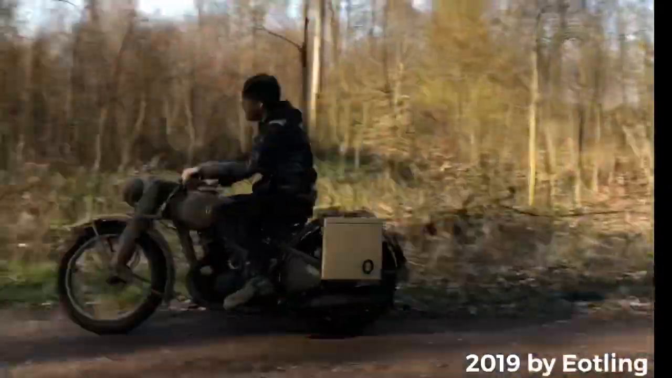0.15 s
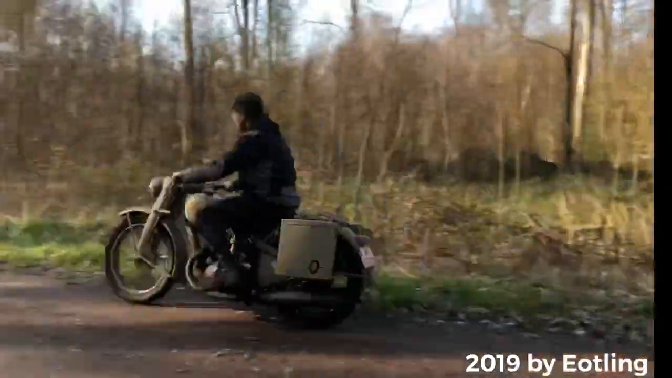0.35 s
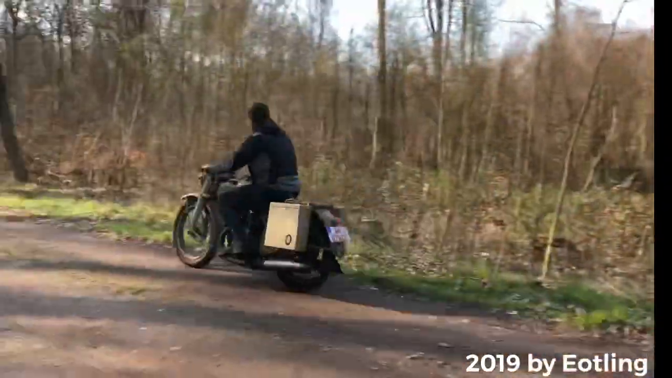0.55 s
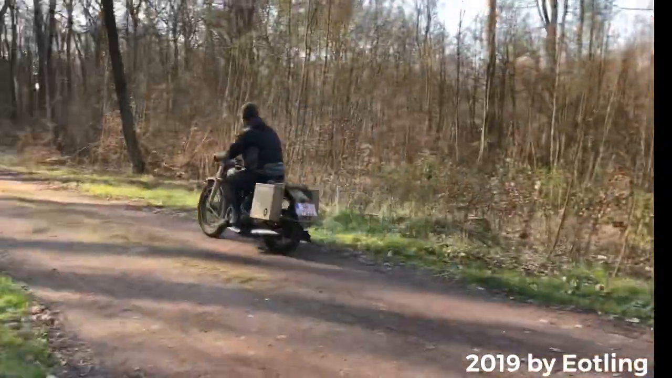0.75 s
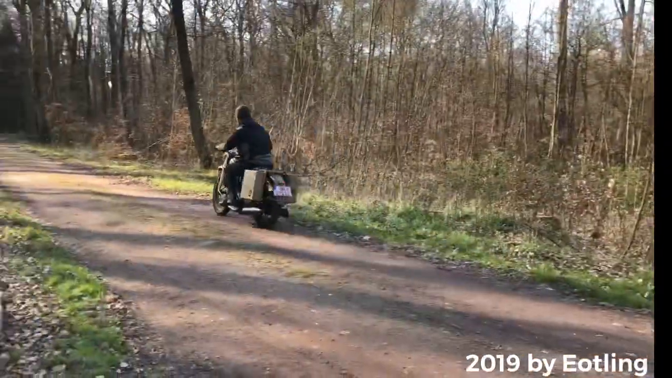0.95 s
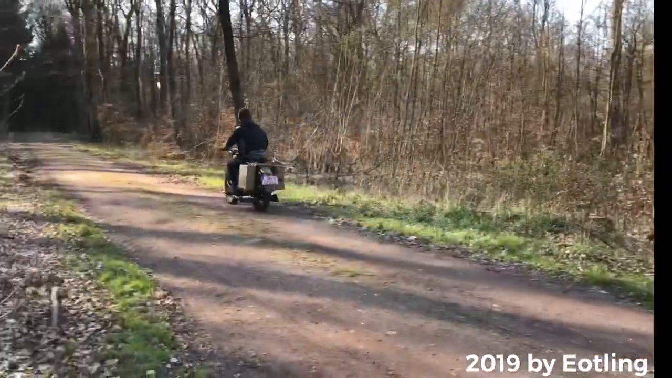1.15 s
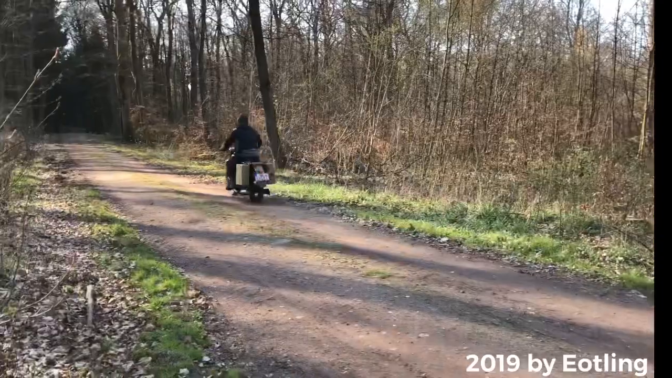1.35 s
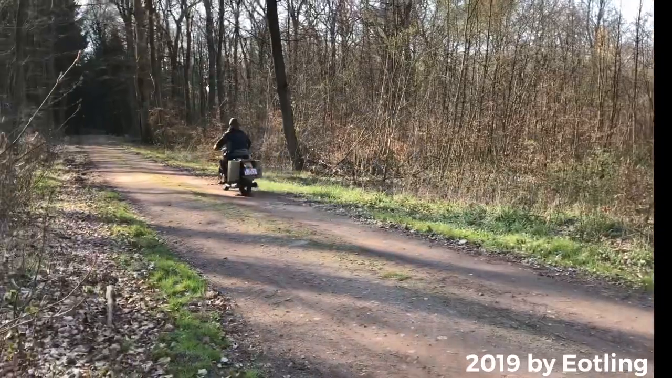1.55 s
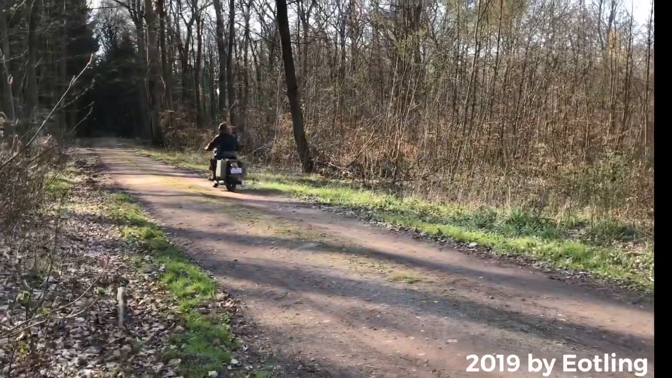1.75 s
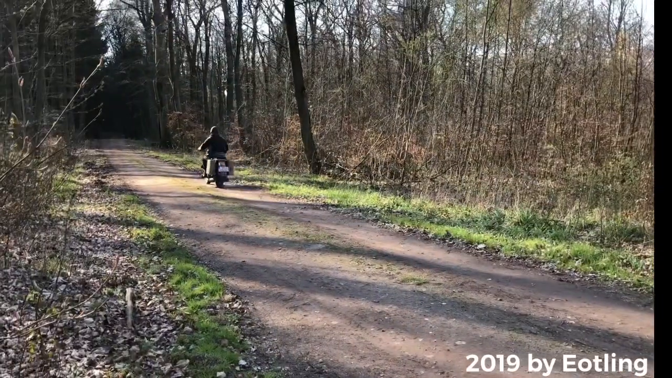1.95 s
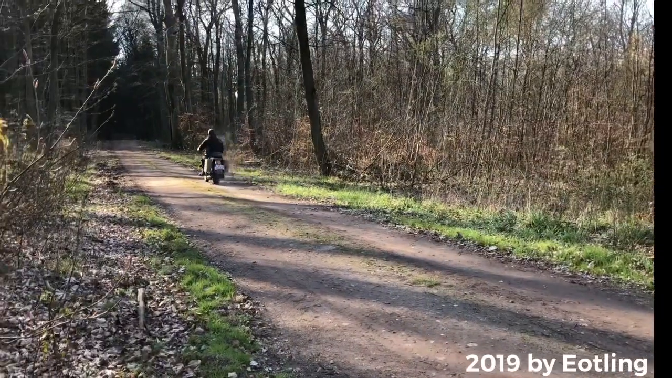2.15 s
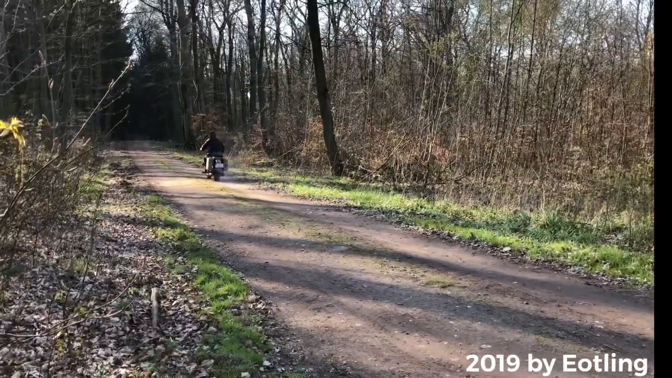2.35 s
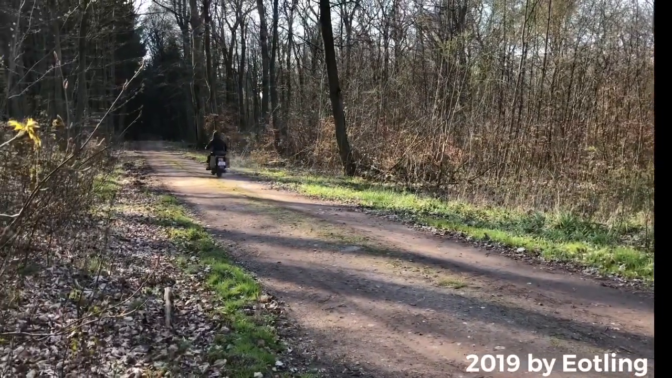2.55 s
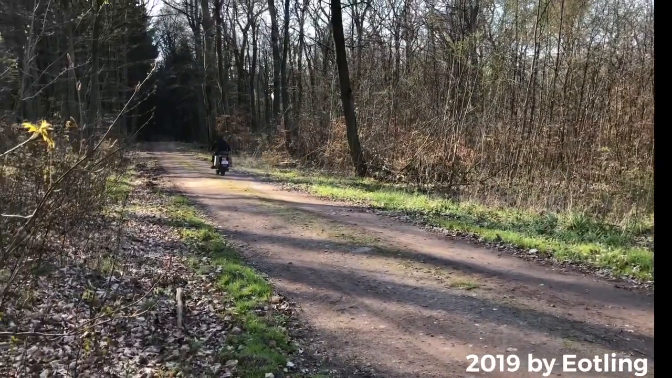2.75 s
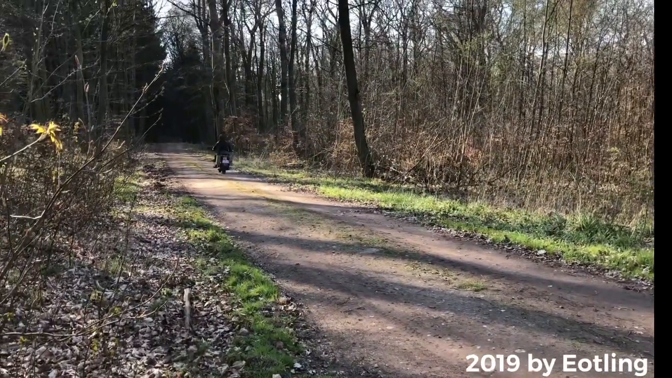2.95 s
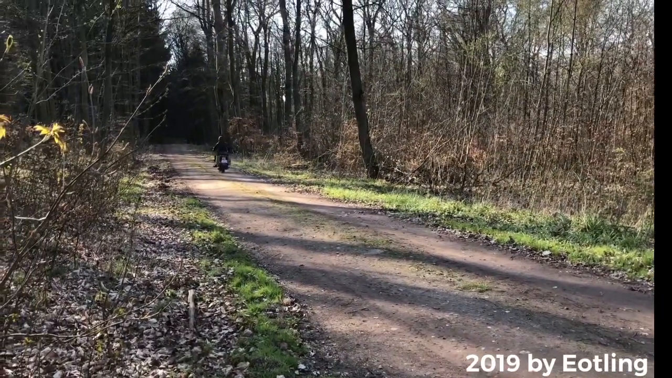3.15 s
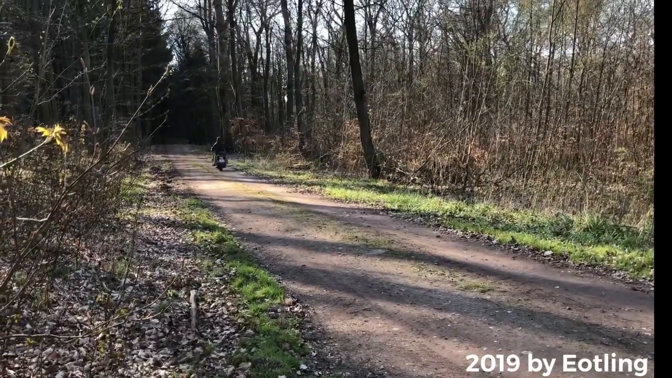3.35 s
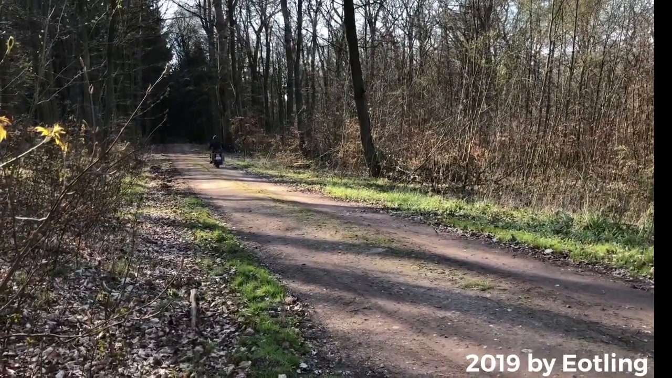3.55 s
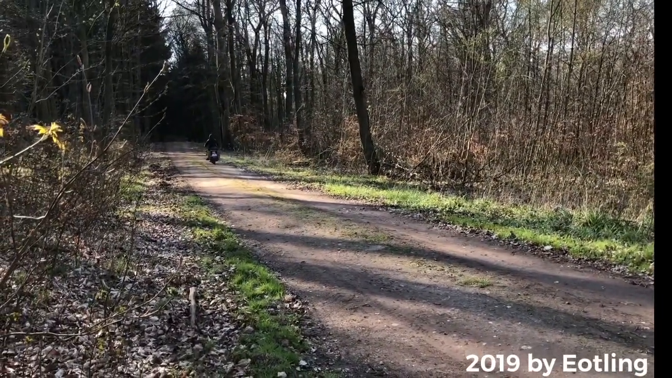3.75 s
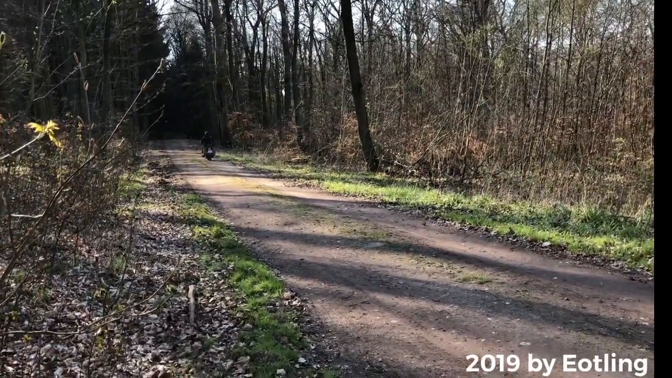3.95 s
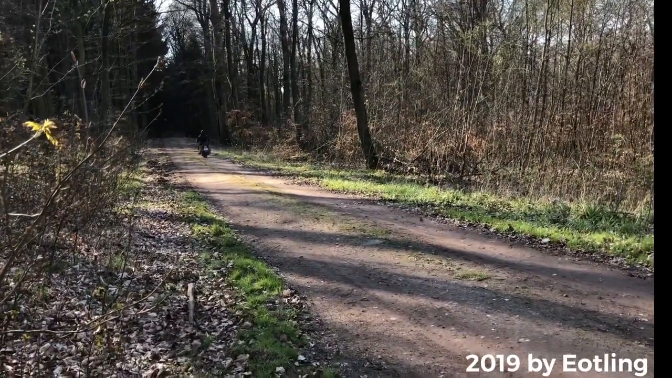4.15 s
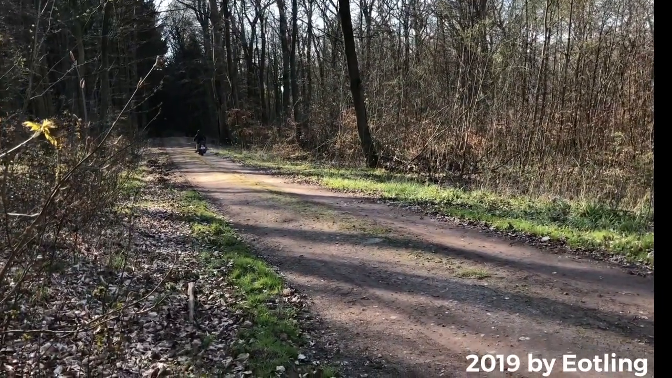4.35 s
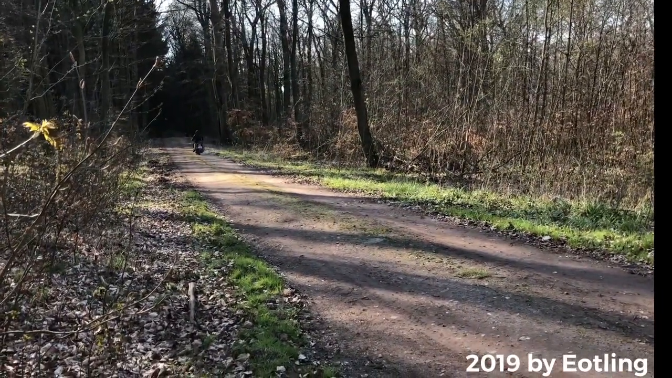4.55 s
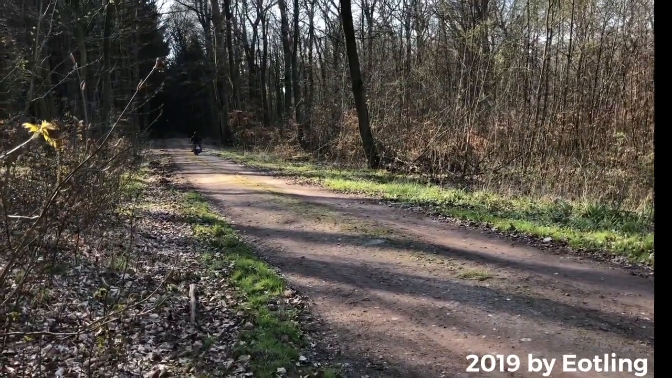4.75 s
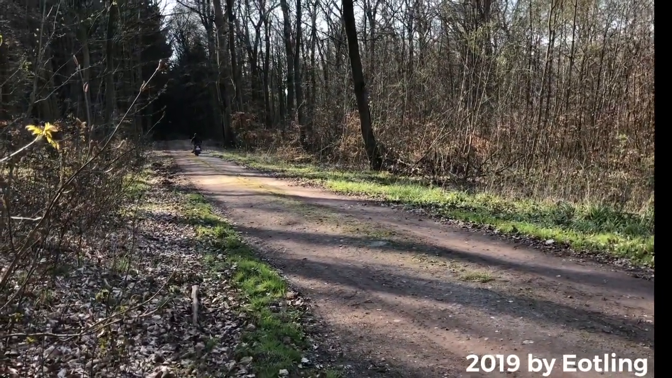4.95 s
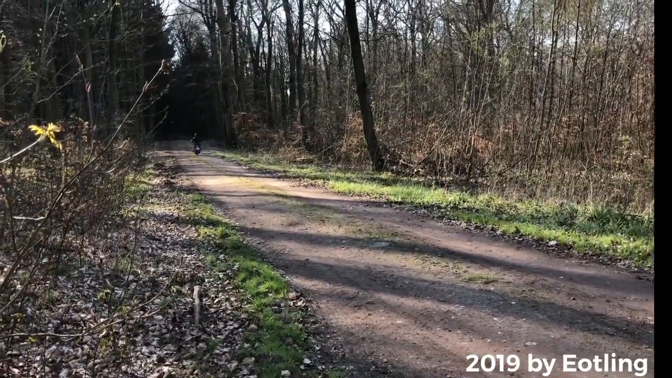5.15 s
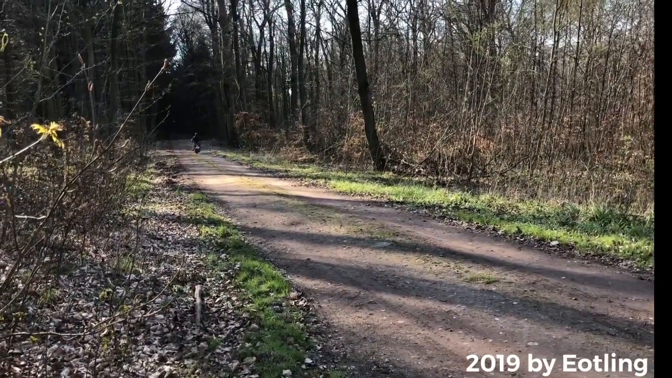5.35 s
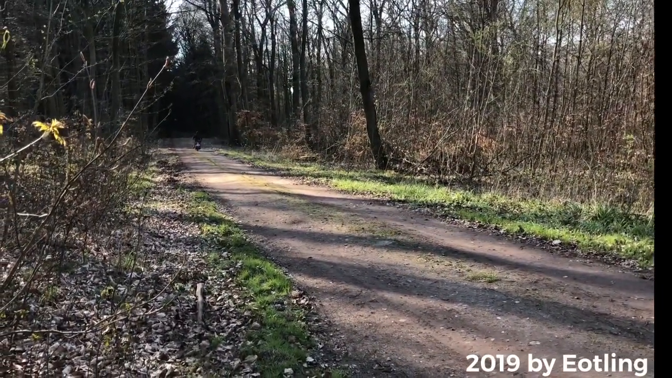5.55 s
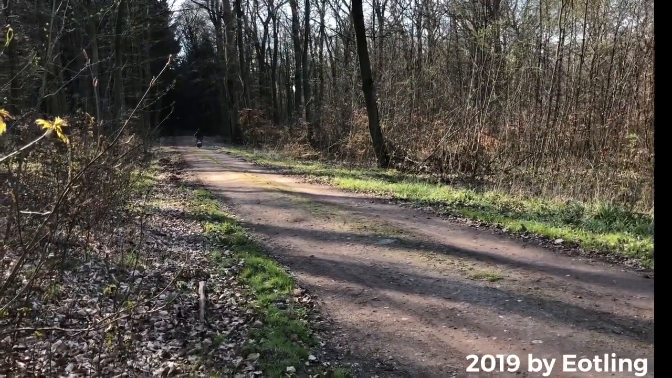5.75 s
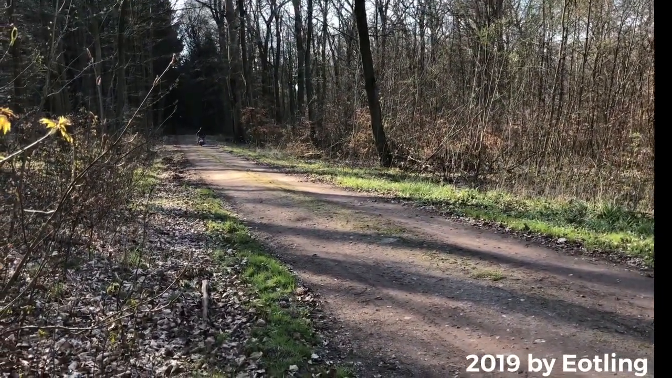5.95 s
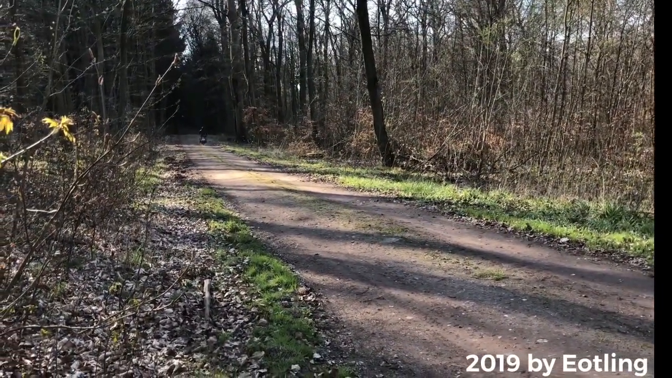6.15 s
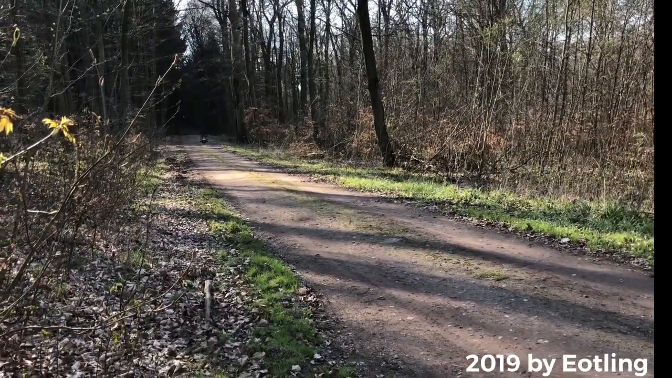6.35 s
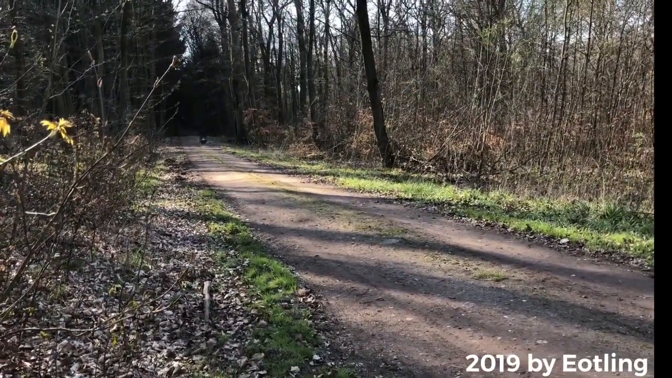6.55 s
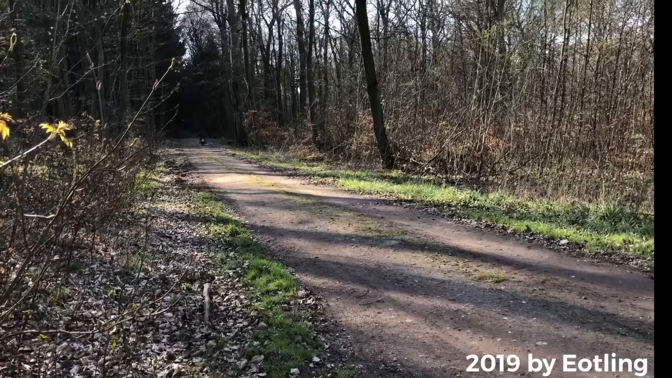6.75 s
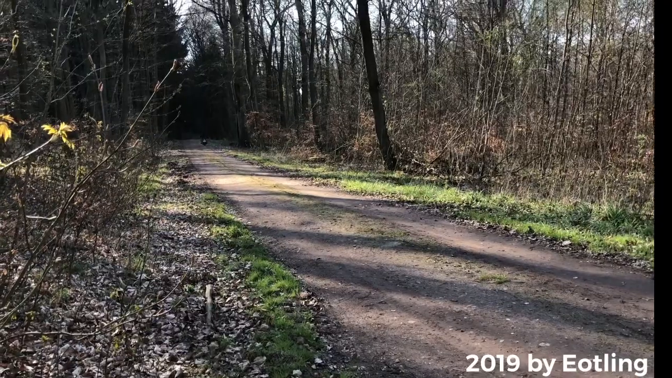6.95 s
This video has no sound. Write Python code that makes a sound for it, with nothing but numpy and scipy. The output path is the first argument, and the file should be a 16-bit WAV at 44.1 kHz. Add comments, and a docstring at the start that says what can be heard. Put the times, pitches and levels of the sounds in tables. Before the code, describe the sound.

An old two-stroke motorcycle passes close on a forest dirt track, popping unevenly, then pulls away with steady fading beats, late scattered pops and faint birds.

```python
"""On a forest dirt track an old single-cylinder two-stroke motorcycle passes and rides away.
It fires unevenly on a light throttle, pulls steadily with a few misfires, then coasts with scattered pops.
Each firing is a falling chirp with a jet of gas noise, and it strikes the decaying modes of the pipe.
A sinking note marks the crankcase gulp of each turn; shaped noise gives tyre and chain hiss, clatter, rumble.
Small birds call in gliding sines, and the trees return the exhaust as sparse, decaying echoes."""
import sys
import numpy as np
from scipy import signal
from scipy.io import wavfile
from scipy.ndimage import uniform_filter1d

SR = 44100
rng = np.random.default_rng(int(sys.argv[2]) if len(sys.argv) > 2 else 0)


def wav_out(sig):
    """Save sig, one row per channel (or a flat mono array), as 16-bit PCM at SR to the path in sys.argv[1]."""
    wavfile.write(sys.argv[1], SR, np.round(np.clip(np.atleast_2d(sig).T, -1, 1) * 32767).astype(np.int16))


N = 312669

# crankshaft speed: (t/s, rate/turns per s)
CRANK_SPEED = [(0, 33.51), (.4, 31.0), (.7, 28.41), (1, 28.7), (1.3, 29.14), (1.8, 29.82), (2.1, 29.69),
               (2.7, 31.43), (3.3, 31.64), (3.9, 31.58), (4.5, 32.59), (5.1, 33.11), (5.3, 32.63),
               (5.8, 33.37), (6.2, 31.47), (6.7, 30.5), (7.2, 30.53)]
FIRST_TURN_S = -.0047  # the exhaust port first opens
PASSING_S = .48  # every turn fires until then, as the machine passes side-on
# interval in which every turn fires, misfires apart: (start t/s, end t/s)
PULLING = (1.82, 5.21)
# turns that fail to fire while pulling: t/s
MISFIRES = [2.405, 3.361, 3.805, 4.333, 4.396]
# single uneven firings: (t/s, relative thud level/dB, relative crack level/dB)
SINGLE_POPS = [(0.5287, -0.5, -8), (0.5648, -8.5, -27), (0.5974, -1.5, -11.5), (0.6321, 1, -13),
               (0.6679, -7, -36), (0.7703, 0.5, -8), (0.8732, -1, -18.5), (.9079, .3, -18),
               (1.0511, .2, -13), (1.1887, 1, -12), (1.2905, -6.5, -33), (1.3267, 0.5, -15.5),
               (1.3607, -2, -21), (1.498, 0.8, -11), (1.604, -1, -8.5), (1.666, 0, -15), (1.7311, 0, -11),
               (1.8007, -1, -11.5), (2.4366, -3.6, -10), (3.3919, -6.7, -10), (3.8363, -7.9, -8),
               (4.3657, -10.5, -8), (4.429, -9.5, -6.5), (4.8866, -16, -26.5), (5.3127, -18, -23),
               (5.3438, -14, -13), (5.4946, -17, -21), (5.5251, -14, -10), (5.6746, -13.5, -6.5),
               (5.7356, -13.5, -11.5), (5.7657, -18, -16), (5.9155, -14.5, -8), (6.0079, -21, -25),
               (6.0409, -14, -10.5), (6.0717, -18, -19), (6.2953, -14, -7.5), (6.4198, -23, -38),
               (6.4532, -16, -10), (6.5499, -16, -10.5), (6.6818, -14.5, -7.5), (6.8136, -15.5, -9.5),
               (6.8452, -20.5, -18.5), (7.0423, -13.5, -9)]
# regular firings, mean levels: (t/s, relative thud level/dB, relative crack level/dB)
STEADY_FIRING = [(0, -3, -23), (.22, -4, -18), (.46, -4, -19), (1.82, -4.5, -22), (2.3, -5, -14.5),
                 (2.8, -7.5, -17.5), (3.8, -11, -14), (4.8, -14.5, -14), (5.21, -15, -15.5)]
# turns without a firing only pump gas down the pipe: (t/s, relative thud level/dB)
UNFIRED_PUMPING = [(0, 3), (.7, -11), (1, -11.5), (1.4, -12.5), (1.8, -12.5), (2.4, -38), (3.4, -29),
                   (4.4, -37), (5.2, -28), (6, -28), (7.1, -31.5)]

# gas jet, for a crack of 0 dB: (t/s, relative level/dB)
JET_LEVEL = [(0, 22), (.45, 0), (.9, 10), (1.6, -0.5), (2.5, -7), (3.8, -17), (5.2, -17.5), (6.3, -15.5),
             (7.1, -7.5)]
JET_PER_CRACK, SNAP_PER_CRACK = 1.76, 1.27  # growth of the jet and of the torn edge, dB per dB of crack
STEADY_JET_DB = 1  # added to the jet of regular firings under load
GROUND_S, GROUND_SHARE = 0.00073, 0.67  # delay and first share of the echo off the track

# chamber resonating with the pulses: (f/Hz, level/dB, t60/s)
SILENCER_MODE = (335.2, -47.5, 0.078)
# low pipe modes, struck as hard as the thud: (f/Hz, level/dB, t60/s)
LOW_PIPE_MODES = [(65, -23.5, 0.11), (97, -49.5, 0.27), (137, -16, .1), (182, -8, 0.04),
                  (269, -31.5, 0.056), (421.8, -15, 0.2)]
# upper pipe modes, weak side-on: (f/Hz, level/dB, t60/s)
UPPER_PIPE_MODES = [(578, -18, 0.097), (682.2, -20, 0.068)]
# high pipe modes, struck as hard as the crack up to a ceiling: (f/Hz, level/dB, t60/s)
TAIL_PIPE_MODES = [(819, -4, 0.026), (893, -18.5, 0.081), (965.7, -9, 0.056), (1273, -5, 0.024),
                   (1362, -7.5, 0.024), (1470, -34, 0.014), (1710, -21.5, 0.03)]
# faint modes that hum on between pops once the throttle is shut: (f/Hz, level/dB, t60/s)
LINGERING_MODES = [(315, -24, .6), (416, -21, .7), (650, -31, .4), (935, -30, .4)]
TURNED_S, SIDE_DB = 1.3, -19.5  # pipe points back from this time; upper-mode gain at the start
CLOSING_PITCH, COOL_PITCH = 1.04, .94  # mode pitch ratios: closing in; in the cool gas of an unfired turn
SAG, COOL_S = .1, .12  # final share by which modes sink as the gas cools; its time constant

# crankcase gulp of each turn, mean: (t/s, level/dB)
GULP_LEVEL = [(0, -11), (.5, -10), (1, -15), (1.8, -21), (3, -24.5), (4.5, -32.5), (5.5, -41), (7.1, -39)]
GULP_TOP_HZ, GULP_END_HZ, GULP_DROP_S = 360, 80, .0075  # first pitch, limit and time constant of its fall

# exhaust returned by the trees: (t/s, level/dB)
FOREST_LEVEL = [(0, -17), (1, -18), (2, -19), (7.1, -19)]
# decay of the forest echoes: (f/Hz, t60/s)
FOREST_DECAY = [(100, 1.5), (400, 1.32), (1200, 0.98), (4000, 1.5), (12000, 0.07)]

# spectrum of the hiss when near: (f/Hz, relative level/dB)
NEAR_HISS = [(880, -28.5), (1500, 2), (1790, -5.5), (1990, -4.5), (2470, -3), (3580, -3), (5300, -0.5),
             (9080, -1.5), (11600, -6), (15600, -24.5)]
# spectrum of the hiss when far, with ringing metal bands: (f/Hz, relative level/dB)
FAR_HISS = [(1180, -34), (2000, -7.5), (2590, -4), (2920, -10), (3870, -2.5), (4700, -7), (5150, -2),
            (5600, -7.5), (7200, -10), (7700, -6.5), (8200, -8), (11400, -22), (13000, -32), (15600, -34)]
# spectrum of the engine clatter: (f/Hz, relative level/dB)
CLATTER_SPECTRUM = [(300, -9), (600, -5.5), (800, -3), (1000, -7.5), (1500, -10.5), (2000, -21),
                    (3000, -25)]
# spectrum of the ground rumble: (f/Hz, relative level/dB)
RUMBLE_SPECTRUM = [(15, -28.5), (30, -19.5), (45, -17), (62, 0.5), (100, -25), (160, -0.5), (250, -8.5)]
# even hiss of tyres and chain: (t/s, level/dB)
ROLLING_LEVEL = [(0, -23), (.45, -27.5), (.7, -39), (1, -38.5), (1.4, -42.5), (1.8, -43.5), (2.5, -42),
                 (3.5, -54), (4.2, -50.5), (5.6, -54), (6.2, -54), (7.1, -55.5)]
# mechanical noise: (t/s, clatter level/dB, rumble level/dB)
CLATTER_AND_RUMBLE = [(0, -23, -21), (.25, -20.5, -26), (.5, -21.5, -17), (.7, -38, -24),
                      (1.2, -38.5, -33.5), (1.7, -36, -32), (2.2, -38.5, -31), (3, -40.5, -48),
                      (4, -43.5, -57), (5.2, -45, -43.5), (7.1, -48, -48.5)]
# bursts of grit and chain rattle: (mid-rise t/s, hold/s, level/dB)
GRIT_BURSTS = [(0.067, 0.014, -19.5), (0.142, 0.037, -12.5), (0.242, 0.024, -13), (0.364, 0.056, -16),
               (0.459, 0.043, -19), (0.552, 0.027, -24.5), (0.67, 0.012, -27), (0.733, 0.019, -34.5),
               (0.93, 0.0082, -34.5), (0.987, 0.0072, -24), (1.098, 0.021, -27), (1.212, 0.017, -31.5),
               (1.363, 0.026, -29), (1.468, 0.012, -25.5), (1.552, 0.018, -30.5), (1.584, 0.011, -35),
               (1.637, 0.01, -21.5), (1.713, 0.052, -33), (1.805, 0.055, -37), (1.993, 0.012, -39.5),
               (2.1, 0.032, -34.5), (2.236, 0.031, -32.5), (2.447, 0.014, -60), (2.728, 0.035, -36),
               (2.865, .03, -43.5), (3, 0.017, -45.5), (3.097, 0.01, -42.5), (3.175, 0.019, -39.5),
               (3.255, 0.1, -43), (3.48, .012, -41.5), (3.69, 0.033, -44), (3.815, .03, -53),
               (5.88, 0.021, -45), (6.237, 0.029, -45.5), (6.45, 0.021, -50), (6.575, 0.046, -55),
               (6.728, 0.11, -48)]
BURST_RISE_S, BURST_FADE_DB_PER_S = 0.036, 228.5

# falling chips of one bird: (start t/s, length/s, first f/Hz, limiting f/Hz, level/dB)
CHIPS = [(3.65, .045, 6200, 4950, -51), (4.035, .05, 6800, 5030, -51), (4.42, .04, 6400, 4970, -51),
         (4.78, .14, 5200, 3830, -58), (5.128, .036, 7300, 5000, -51), (5.525, .045, 6900, 4920, -53)]
CHIP_DROP_S = .011  # time constant of the fall in pitch
# slurred whistles: (start t/s, length/s, first f/Hz, middle f/Hz, last f/Hz, level/dB)
SLURS = [(5.185, .07, 3900, 3530, 3600, -61), (5.575, .085, 4400, 3480, 3900, -60),
         (5.835, .155, 3450, 4100, 3600, -57.5), (6.09, .06, 3650, 3880, 4400, -56.5)]

EDGE_HZ = 15750  # upper band limit


def exhaust():
    """Dispersion of a blast: the steep front leaves first as a crack, the thud follows at falling pitch."""
    t = np.arange(1600) / SR
    chirp_hz = 326 + 1034 * np.exp(-(t / 0.002297) ** 2)
    chirp = -np.sin(2 * np.pi * np.cumsum(chirp_hz) / SR)
    crack = chirp * (1 - np.exp(-(t / 0.00077) ** 3)) * np.exp(-(t / 0.0031) ** 4)
    thud = chirp * (1 - np.exp(-(t / 0.0039) ** 4)) * np.exp(-(t / 0.0063) ** 2)
    puff = np.clip((t - .0005) / 0.00085, 0, 1) * (np.exp(-t / 0.0018) + 0.45 * np.exp(-t / 0.0076))
    edge = puff * np.exp(-t / 0.00088)
    late = (t / 0.0056) ** 2 * np.exp(-t / 0.0036)
    shell_band = signal.butter(1, [2480, 2540], "band", fs=SR, output="sos")  # a hot shell sings under load
    snap_band = signal.butter(2, [1400, 3700], "band", fs=SR, output="sos")  # the torn edge of the front
    rows, kinds = firings()
    gas_noises = rng.standard_normal((len(rows), len(t)))
    jets = np.zeros(N)
    trains = np.zeros((3, 3, N))  # kind of turn, then pulses, low strikes, high strikes
    for (s, thud_db, crack_db, jet_db), kind, gas in zip(rows, kinds, gas_noises):
        pulses, low, high = trains[kind]
        blow = amp(thud_db + 5.5) * thud + amp(crack_db - 3.5) * crack
        nearness = np.sqrt(max(1 - s / TURNED_S, 0))
        add(pulses, s, blow)
        add(pulses, s + GROUND_S, GROUND_SHARE * nearness * blow)
        add(low, s + 0.002883, amp([thud_db]))
        add(high, s + 0.002864, amp([min(crack_db, -16)]))  # the ring stops growing with the hardest cracks
        air_hz = 12500 / (1 + .075 * s)  # the air dulls the jet as the distance grows
        jet_band = signal.butter(2, [1800, air_hz], "band", fs=SR, output="sos")
        add(jets, s, amp(jet_db + 2) * puff * signal.sosfilt(jet_band, gas))
        add(jets, s, amp(SNAP_PER_CRACK * crack_db) * edge * signal.sosfilt(snap_band, gas))
        if PULLING[0] < s < PULLING[1]:
            add(jets, s, amp(crack_db + 3.5) * late * signal.sosfilt(shell_band, gas))
    pitches = (CLOSING_PITCH, 1, COOL_PITCH)
    struck = sum(pipe(*train, pitch) for train, pitch in zip(trains, pitches))
    return trains[:, 0].sum(axis=0) + jets + gulps(rows[:, 0]) + struck


def firings():
    """Integrated crank speed sets the two-stroke cycle: one row (t/s, thud, crack, jet level/dB) a turn.

    The kinds are 0 closing in, 1 fired, 2 unfired."""
    step_s = .0005
    t = np.arange(FIRST_TURN_S, N / SR, step_s)
    turns = np.cumsum(columns(CRANK_SPEED, t)[0]) * step_s
    even = np.interp(np.arange(int(turns[-1])) + turns[0], turns, t)
    chance = rng.standard_normal((len(even), 4))
    passing = even < PASSING_S
    s = even + np.where(passing, .0012, .0003) * chance[:, 0]
    rows = np.column_stack([s, *columns(STEADY_FIRING, s)])
    rows = rows + chance[:, :3] * [0, .6, 1.2]
    missed = abs(s[:, None] - MISFIRES).min(axis=1) < .012
    idle = ((s < PULLING[0]) & ~passing) | (s > PULLING[1]) | missed
    pump_db = columns(UNFIRED_PUMPING, s)[0] + 0.63 * chance[:, 1]
    rows[idle, 1:] = (pump_db[:, None] - [0, 16])[idle]
    loaded = ~idle & ~passing
    for pop in SINGLE_POPS:  # each pop takes over the nearest turn
        nearest = np.argmin(abs(s - pop[0]))
        rows[nearest], loaded[nearest], idle[nearest] = pop, False, False
    jet_db = JET_PER_CRACK * rows[:, 2] + columns(JET_LEVEL, s)[0] + STEADY_JET_DB * loaded
    jet_db = jet_db + np.where(passing, 3.5, 1.5) * chance[:, 3]
    return np.column_stack([rows, jet_db]), np.where(passing, 0, 1 + idle)


def pipe(pulses, low, high, pitch):
    """Modal resonance: blows ring the silencer and pipe modes, all scaled by one pitch ratio."""
    t = np.arange(N) / SR
    facing = amp(SIDE_DB * np.clip(1 - t / TURNED_S, 0, 1) ** .5)
    shut = t > PULLING[1]
    # drive, modes, rise time in s
    parts = [(low, LOW_PIPE_MODES, .003), (low * shut, LINGERING_MODES, .003),
             (low * facing, UPPER_PIPE_MODES, .003), (high, TAIL_PIPE_MODES, .0035),
             (pulses, [SILENCER_MODE], .0002)]
    return sum(signal.oaconvolve(drive, ring(np.array(modes) * [pitch, 1, 1], rise_s))[:N]
               for drive, modes, rise_s in parts)


def ring(modes, rise_s):
    """Free damped oscillation: dying sines with a soft start, sinking in pitch as the gas cools."""
    t = np.arange(16000) / SR
    slowed = t - SAG * (t - COOL_S * (1 - np.exp(-t / COOL_S)))
    dying = sum(amp(db - 60 * t / t60) * np.sin(2 * np.pi * hz * slowed) for hz, db, t60 in modes)
    return dying * (1 - np.exp(-(t / rise_s) ** 2))


def gulps(moments):
    """Intake suction: the crankcase draws air once a turn, a soft note that sinks in pitch."""
    t = np.arange(2000) / SR
    hz = GULP_END_HZ + (GULP_TOP_HZ - GULP_END_HZ) * np.exp(-t / GULP_DROP_S)
    swell = (1 - np.exp(-(t / .004) ** 2)) * np.exp(-(t / .021) ** 3)
    note = -np.sin(2 * np.pi * np.cumsum(hz) / SR) * swell
    levels_db = columns(GULP_LEVEL, moments)[0] + 0.27 * rng.standard_normal(len(moments))
    out = np.zeros(N)
    for s, db in zip(moments, levels_db):
        add(out, s, amp(db) * note)
    return out


def forest(x):
    """Multiple scattering: trunks return sparse echoes of random sign, each band with its own decay."""
    taps = np.zeros(SR)
    at = np.arange(500, SR - 22, 22)
    taps[at + rng.integers(0, 22, len(at))] = rng.choice([-1., 1.], len(at))
    hz, t, z = signal.stft(taps, SR, nperseg=512)
    decay = amp(-60 * t / read(FOREST_DECAY, hz)[:, None])
    tail = signal.istft(z * decay, SR, nperseg=512)[1]
    wet_db, = columns(FOREST_LEVEL, np.arange(N) / SR)
    return signal.fftconvolve(x * amp(wet_db), tail / np.linalg.norm(tail))[:N]


def rolling():
    """Broadband friction and impact: grit hiss that dulls with distance, engine clatter, ground rumble."""
    t = np.arange(N) / SR
    clatter_db, rumble_db = columns(CLATTER_AND_RUMBLE, t)
    slow = t[::32]
    burst_power = np.interp(t, slow, bursts(slow).sum(axis=0))
    level = np.sqrt(amp(columns(ROLLING_LEVEL, t)[0]) ** 2 + burst_power)
    far = np.clip((t - 2.2) / 3.0, 0, 1)
    near_hiss = noise(NEAR_HISS, size=256, patchy_db=2.5, flicker_db=3.0)
    far_hiss = noise(FAR_HISS, size=256, patchy_db=3.5, flicker_db=0.5)
    hiss = np.sqrt(1 - far) * near_hiss + np.sqrt(far) * far_hiss
    clatter = noise(CLATTER_SPECTRUM, size=512, patchy_db=4.0, flicker_db=2.5)
    rumble = noise(RUMBLE_SPECTRUM, size=2048, patchy_db=1.5, flicker_db=1.1)
    return level * hiss + amp(clatter_db) * clatter + amp(rumble_db) * rumble


def bursts(t):
    """Impulsive excitation: the power of each burst has a quick rise, a hold and an even fade in dB."""
    start, hold, db = np.transpose(GRIT_BURSTS)[:, :, None]
    rise = np.clip((t - start) / BURST_RISE_S + .5, 0, 1)
    fade_db = BURST_FADE_DB_PER_S * np.maximum(t - start - hold, 0)
    return (rise * amp(db - fade_db)) ** 2


def birds():
    """Frequency modulation: thin whistles, single gliding sines that swell and fade."""
    out = np.zeros(N)
    calls = []
    for start, length, first_hz, last_hz, db in CHIPS:
        t = np.arange(0, length, 1 / SR)
        calls.append((start, last_hz + (first_hz - last_hz) * np.exp(-t / CHIP_DROP_S), db))
    for start, length, *pitch_hz, db in SLURS:
        share = np.arange(0, length, 1 / SR) / length
        glide = np.polyfit([0, .5, 1], pitch_hz, 2)  # parabola through the three pitches
        calls.append((start, np.polyval(glide, share), db))
    for start, hz, db in calls:
        swell = np.sin(np.linspace(0, np.pi, len(hz))) ** 0.4
        whistle = np.sin(2 * np.pi * np.cumsum(hz) / SR)
        add(out, start, np.sqrt(2) * amp(db) * swell * whistle)
    return out


def noise(spectrum, size, patchy_db, flicker_db):
    """Filtered random noise: short-time spectra with drifting patches and a flicker shared by all bands."""
    frames, hz = 4 * N // size + 5, np.fft.rfftfreq(size, 1 / SR)
    real, imaginary, patches = rng.standard_normal((frames, len(hz), 3)).T
    patches = uniform_filter1d(patches, size=8, axis=0)  # over frequency
    patches = evened(uniform_filter1d(patches, size=6, axis=1))  # over time
    flicker = evened(uniform_filter1d(rng.standard_normal(frames), size=4))
    beyond = hz > 1.05 * spectrum[-1][0]
    colour_db = read(spectrum, hz)[:, None] - 60 * beyond[:, None]
    z = (real + 1j * imaginary) * amp(colour_db + patchy_db * patches + flicker_db * flicker)
    return evened(signal.istft(z, nperseg=size, noverlap=3 * size // 4)[1][:N])


def amp(db):
    """Logarithmic level: the amplitude gain of a level in dB."""
    return 10 ** (np.asarray(db) / 20)


def evened(x):
    """Normalised power: scales to rms 1."""
    return x / np.sqrt(np.mean(x ** 2) + 1e-20)


def read(points, hz):
    """Logarithmic frequency: a curve interpolated on a log-frequency axis."""
    f, value = np.transpose(points)
    return np.interp(np.log(hz + 1), np.log(f + 1), value)


def columns(rows, t):
    """Linear interpolation: the columns of a curve table read at the times t."""
    s, *values = np.transpose(rows)
    return [np.interp(t, s, v) for v in values]


def add(mix, s, sound):
    """Superposition: adds a sound into the mix at time s."""
    part = mix[max(round(s * SR), 0):][:len(sound)]
    part += sound[:len(part)]


def scene():
    """Superposition of all sources at one microphone."""
    engine = exhaust()
    return (engine + forest(engine) + rolling() + birds())[None]


def record(dry):
    """Transducer limits: bass cut, soft clipping of the loudest pulses, upper band limit."""
    cut = signal.sosfilt(signal.butter(3, 52, "high", fs=SR, output="sos"), dry)  # small microphone
    clipped = cut / (1 + abs(cut) ** 8) ** (1 / 8)
    lowpass = signal.firwin(511, EDGE_HZ, window=("kaiser", 9), fs=SR)
    return signal.oaconvolve(clipped, lowpass[None], "same")


dry = scene()
out = record(dry)
wav_out(out)
```